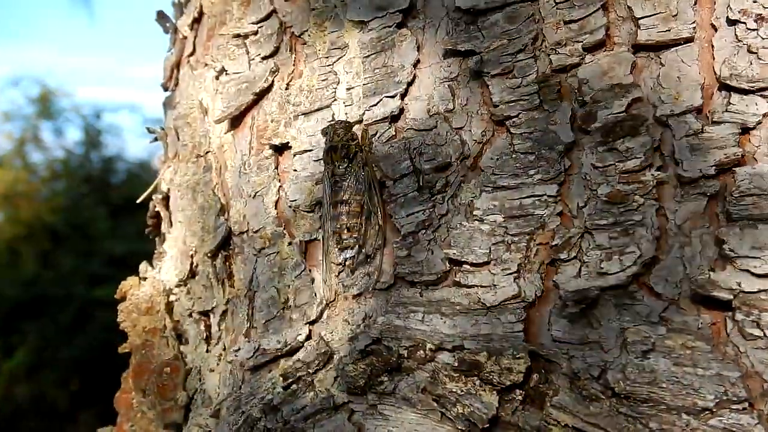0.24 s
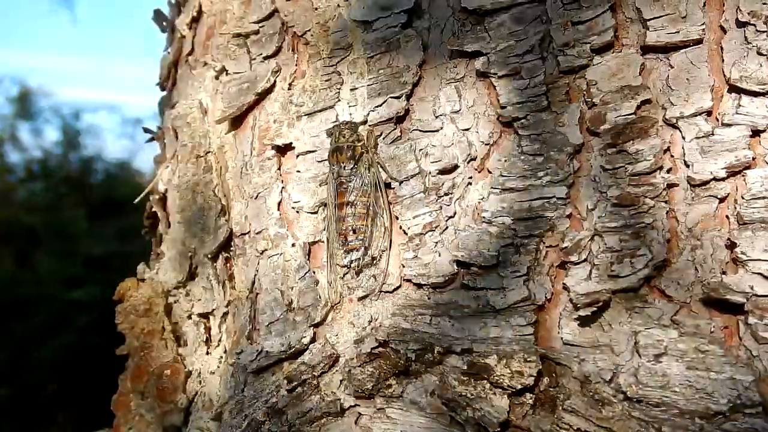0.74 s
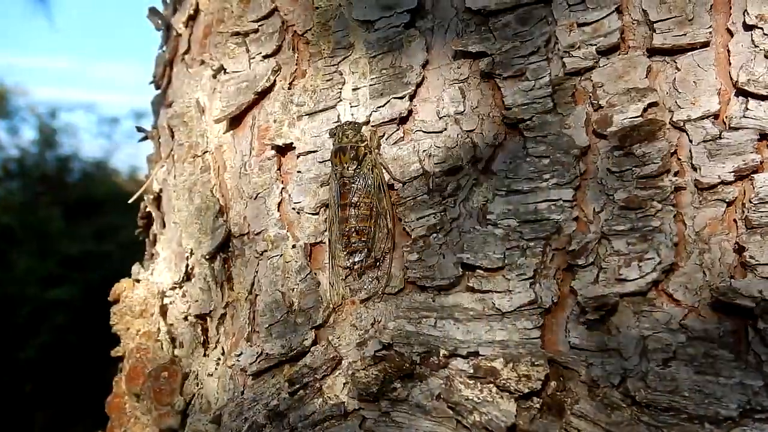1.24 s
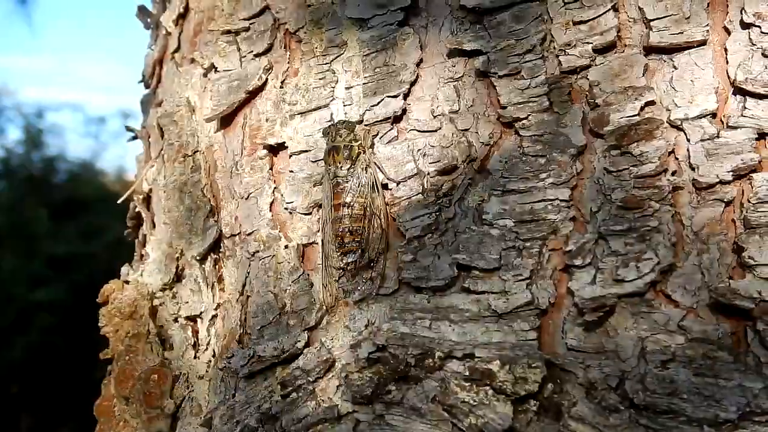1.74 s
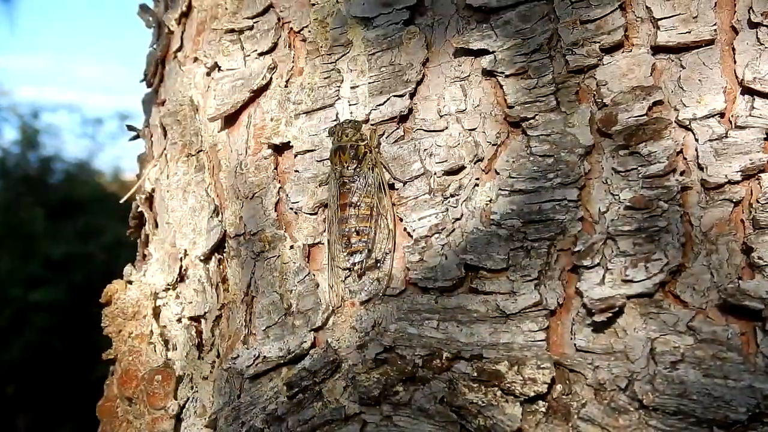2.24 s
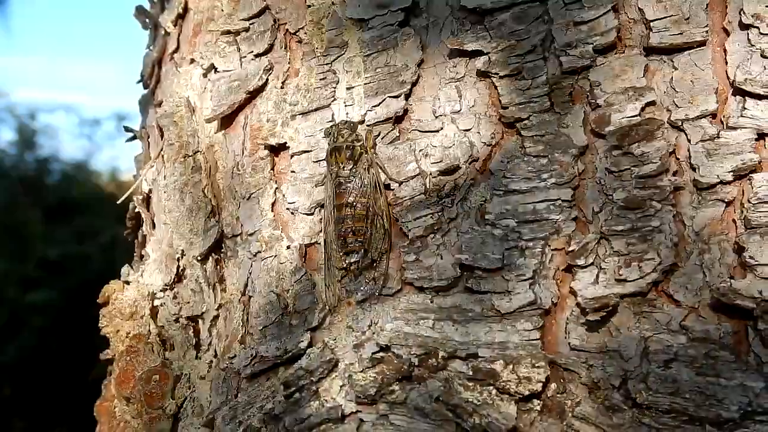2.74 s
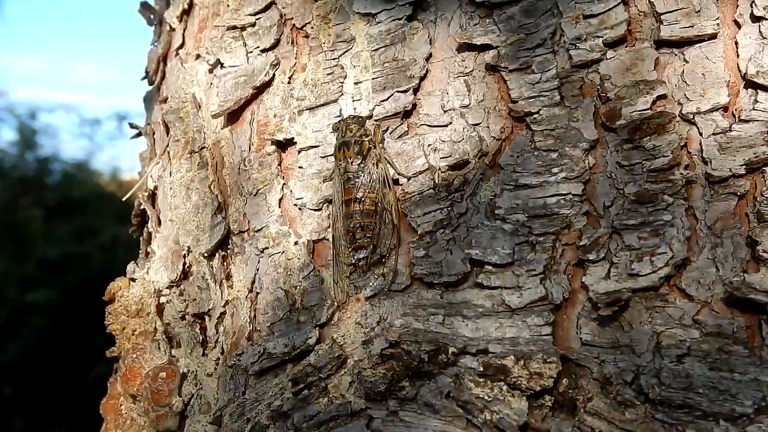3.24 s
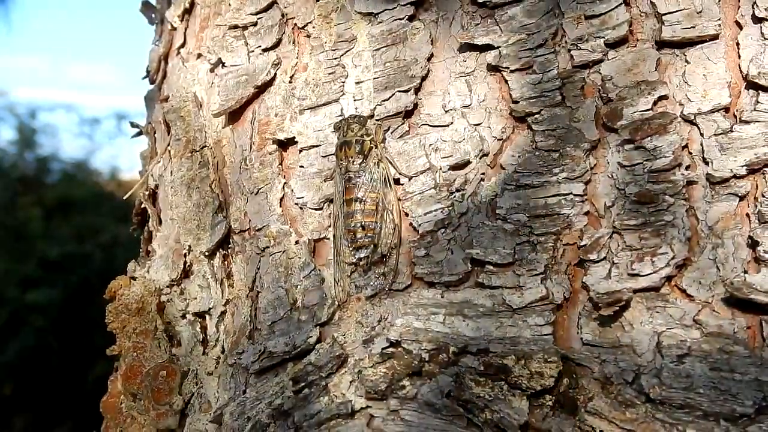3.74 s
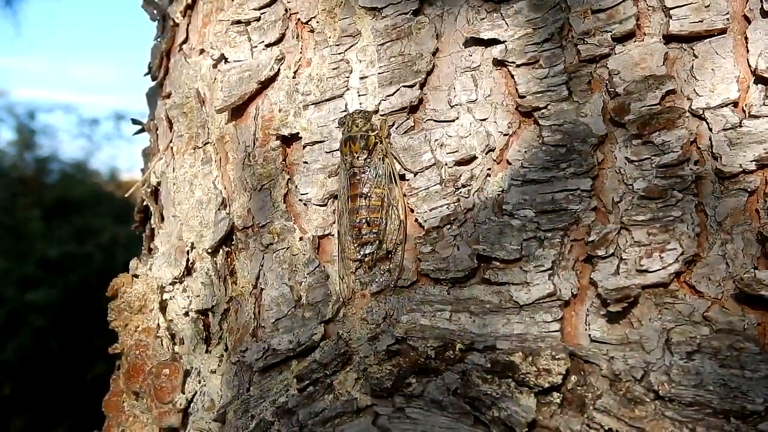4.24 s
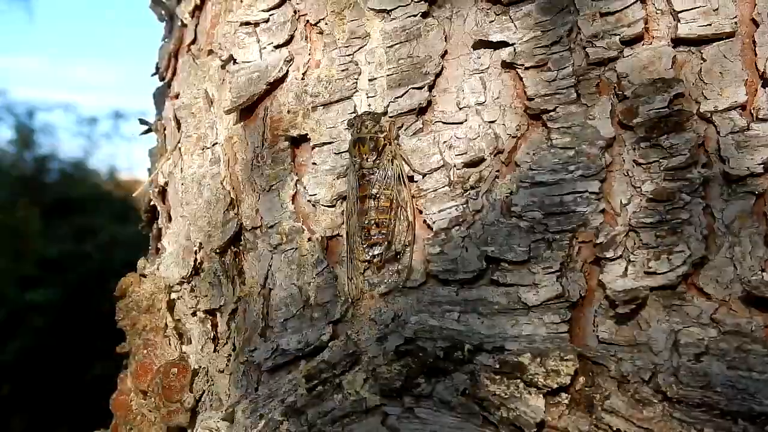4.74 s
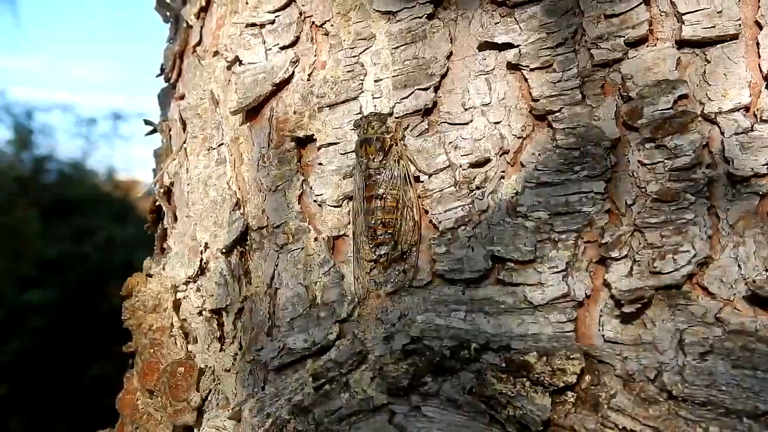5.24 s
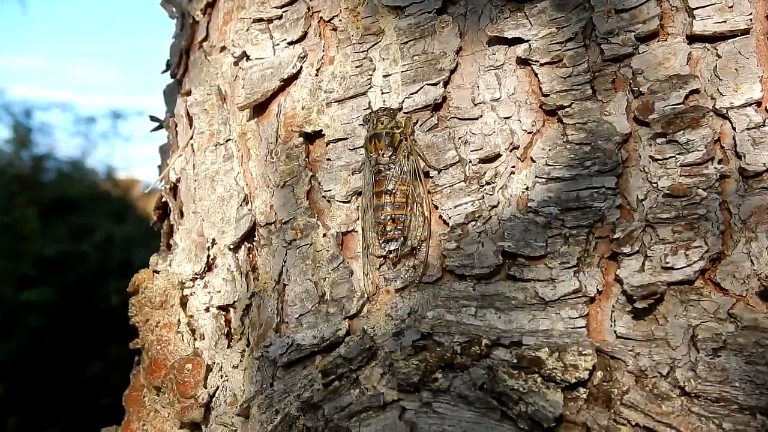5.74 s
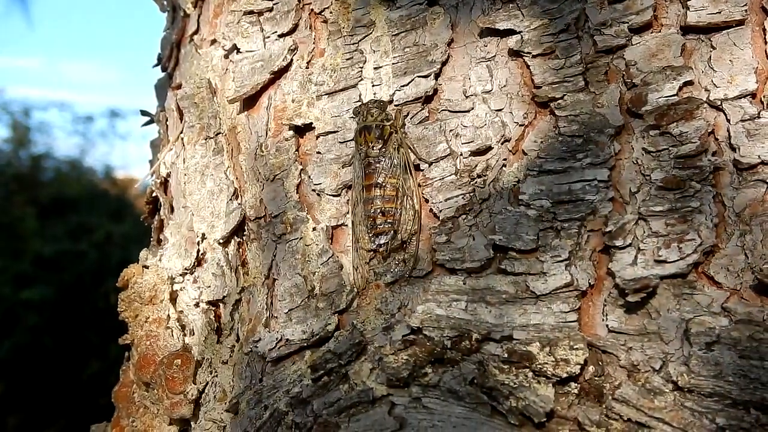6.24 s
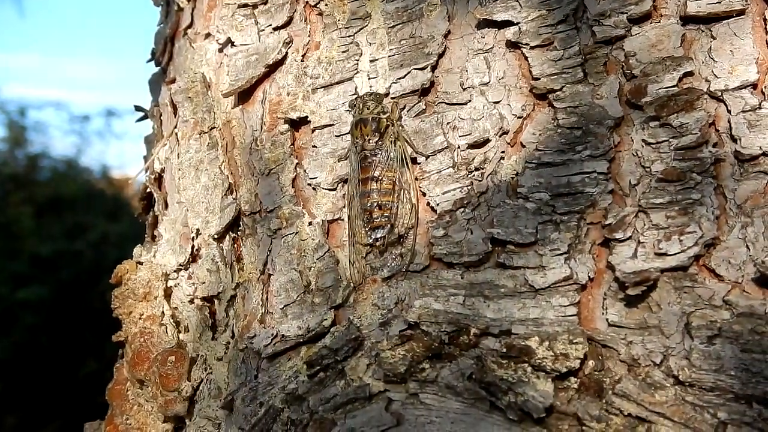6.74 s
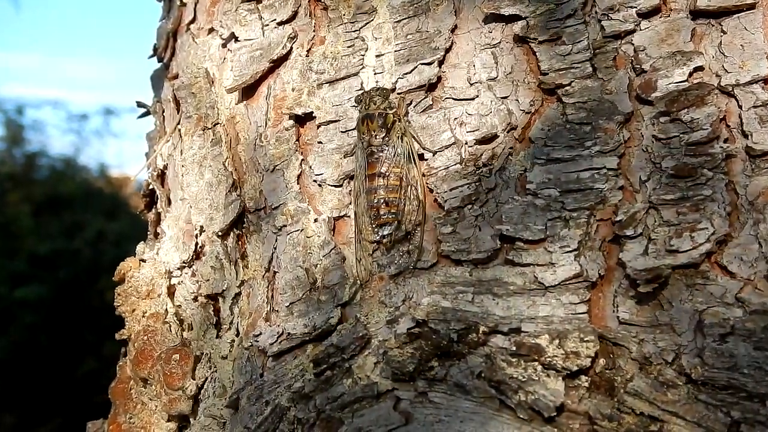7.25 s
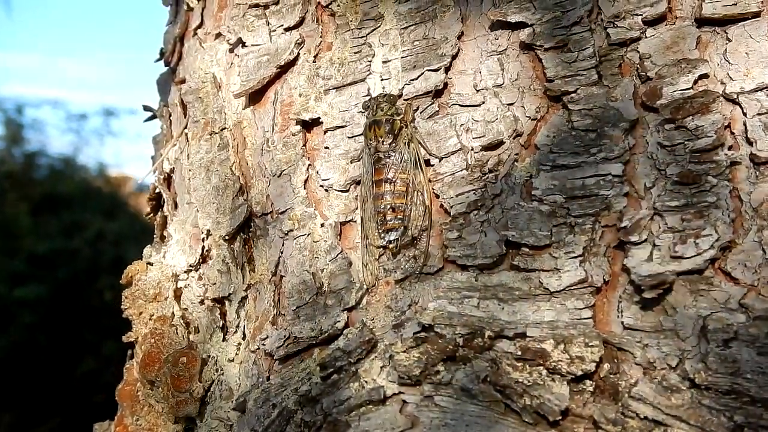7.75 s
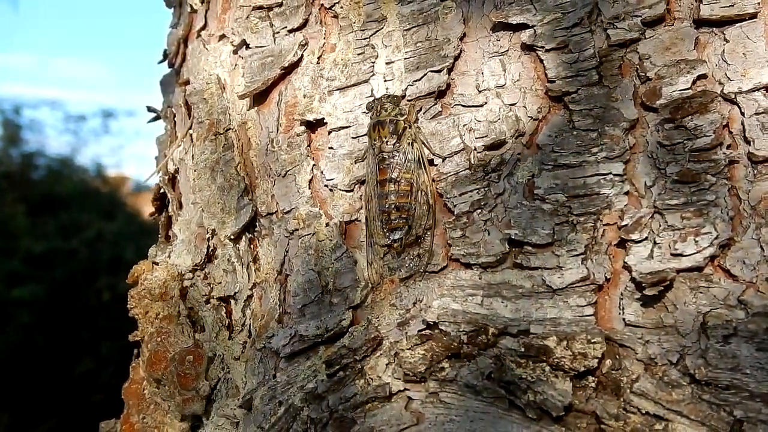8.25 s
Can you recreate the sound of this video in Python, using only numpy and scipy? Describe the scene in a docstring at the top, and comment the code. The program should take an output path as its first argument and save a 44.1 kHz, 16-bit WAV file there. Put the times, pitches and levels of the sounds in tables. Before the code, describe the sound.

Very close outdoors, one cicada on a tree trunk repeats a short, bright, rattling chirp about every 0.4 seconds. Each chirp lasts under a tenth of a second, opens with a faint tick, then swells into a rapid buzz and stops abruptly. Low soft wind buffets and puffs touch the microphone mainly in the first two and a half seconds, then mostly fade. A faint smooth background haze continues throughout, with little echo.

```python
"""A cicada sings on a pine trunk, close to the microphone: about 2.4 short rasping chirps a second.
In each chirp two tymbals buckle in turn; every stroke is two rib snaps, then a slowing run of clicks.
The clicks ring through body spectra and scatter off bark and trees as decaying noise echoes.
A light breeze buffets the microphone, mostly at first, as gusty shaped noise with single puffs.
Behind it lies a faint far haze of smooth noise; capsules, gain control and filters shape the sum."""
import sys
import numpy as np
from scipy import signal
from scipy.fft import rfft, irfft, next_fast_len
from scipy.io import wavfile
from scipy.ndimage import uniform_filter1d

SR = 44100
rng = np.random.default_rng(int(sys.argv[2]) if len(sys.argv) > 2 else 0)


def unload_wav(signal):
    """Save mono or channel-first audio to the path in sys.argv[1] as 16-bit WAV at rate SR, clipped to [-1, 1]."""
    wavfile.write(
        sys.argv[1],
        SR,
        np.round(np.clip(np.atleast_2d(signal).T, -1, 1) * 32767).astype(np.int16),
    )


N = 374409
TIME_S = np.arange(N) / SR
SIZE = next_fast_len(N + SR, real=True)
FREQS_HZ = np.maximum(np.arange(SIZE // 2 + 1) * SR / SIZE, 1)

# breeze strength at the microphone: (time [s], relative level [dB])
BREEZE_LEVEL = [(0, -49), (.28, -58.5), (.85, -53), (1.35, -54.5), (1.63, -44.5), (1.88, -59.5),
                (2.08, -50), (2.22, -65), (2.5, -56.5), (3.3, -73.5), (4.5, -64.5), (4.8, -75),
                (5.3, -60.5), (5.95, -77.5), (6.45, -54.5), (6.9, -70.5), (8.2, -58), (8.49, -68.5)]
# colour of its buffeting: (frequency [Hz], relative density [dB per Hz])
BUFFET_COLOUR = [(25, -28), (60, -20), (95, -15), (130, -1.5), (170, 1.5), (240, -2.5), (330, -7.5),
                 (550, -20), (1000, -26.5), (1500, -45), (3000, -61.5), (10000, -90.5)]
# brighter rush of a strong gust: (frequency [Hz], relative density [dB per Hz])
GUST_COLOUR = [(120, -29), (220, -8), (330, -2.5), (600, -4.5), (1100, -21), (2000, -41.5), (8000, -89)]
# far haze: (time [s], level [dB])
HAZE_LEVEL = [(0, -64.5), (2.2, -62), (3, -61.5), (4, -61.5), (5.5, -60), (7, -61.5), (8.49, -60)]
# its colour: (frequency [Hz], relative density [dB per Hz])
HAZE_COLOUR = [(25, -22.5), (90, -9), (170, -5), (400, -6), (700, -2), (1200, -7), (2000, -13), (2800, -19),
               (3800, -31.5), (4900, -19.5), (5900, -22.5), (8000, -34), (11000, -42), (15000, -36.5)]
# its left-right likeness: (frequency [Hz], likeness [0-1])
HAZE_LIKENESS = [(100, 0.6), (700, 0.9), (2000, 0.2), (5000, .4), (9000, .1)]
# air puffs thumping on the microphone: (peak time [s], relative level [dB], Gaussian sigma [s])
PUFFS = [(0.044, -41.5, 0.011), (.218, -43.5, 0.0054), (.475, -36.5, 0.012), (.715, -44, 0.0061),
         (.84, -40.5, 0.013), (1.26, -43, 0.01), (1.49, -37, 0.0087), (1.587, -39.5, .009),
         (1.65, -38, .009), (1.82, -48.5, 0.007), (2.01, -34, .012), (2.13, -42.5, 0.0096),
         (2.388, -46.5, .012), (2.495, -46, 0.013), (2.999, -53, .025), (4.385, -49.5, 0.011),
         (4.672, -48, .008), (6.335, -47, 0.018), (6.5, -46.5, 0.0069), (7.611, -46, .008),
         (7.89, -52, 0.0093), (8.299, -42.5, 0.01)]
# chirps: (start [s], length [s], relative level [dB])
CHIRPS = [(0.054, 0.078, -0.1), (0.4219, 0.088, 0.5), (0.8229, 0.094, 0.8), (1.2156, 0.077, 1),
          (1.619, 0.092, 1.3), (2.072, 0.091, 0.5), (2.536, 0.086, 0.5), (2.9542, 0.093, 0.4),
          (3.3563, 0.091, 1), (3.7527, 0.087, 1.5), (4.161, 0.091, 2), (4.5604, 0.087, 2),
          (4.9776, 0.093, 1.5), (5.3712, 0.087, 1.5), (5.766, 0.088, 1.6), (6.191, 0.086, 1.5),
          (6.5711, 0.089, 1.36), (7.003, 0.089, 1.5), (7.3887, 0.09, 1.5), (7.8215, 0.089, 1.5),
          (8.2527, 0.084, 1)]
# stroke spacing, shortening through the song: (time [s], gap [s])
STROKE_GAP = [(0, 0.0064), (3.2, .00608), (8.4, .00597)]
# first ribs of a stroke, each a clean snap: (delay [s], relative level [dB])
SNAPS = [(.0005, 1.5), (.0019, 3)]
# body radiation of the snaps: (frequency [Hz], relative gain [dB])
SNAP_COLOUR = [(300, -50), (1400, -49), (2100, -24.5), (2800, -16.5), (3500, -43), (3950, -21.5),
               (4500, -9.5), (5150, 1.5), (5550, -4.5), (6100, -24.5), (7200, -32.5), (8300, -43.5),
               (9200, -55), (15000, -72.5)]
# remaining ribs, a quick run in order: (relative level [dB])
RUN_LEVELS = [-12.5, 0.5, 1, 0, 5, 0, 5, -3.5]
# body radiation of the run: (frequency [Hz], relative gain [dB])
RUN_COLOUR = [(300, -49.5), (1400, -43), (1850, -13), (2250, -12.5), (2900, -12), (3450, -31),
              (3800, -18.5), (4250, 3), (5300, 6.5), (6000, -2.5), (6950, -10.5), (8200, -31), (9100, -52),
              (13000, -63.5)]
# left minus right at the two ports: (frequency [Hz], level difference [dB])
PORT_BALANCE = [(800, -13.5), (1900, 1), (2900, -4.5), (3500, -3.5), (4300, 3), (5300, 3), (6900, 7),
                (8000, 18), (9200, 6), (14000, -4)]
# lead of left over right: (frequency [Hz], phase [rad])
PORT_PHASE = [(3200, 0.015), (4200, 0.38), (5000, 1.2), (6200, .95), (7300, 0.81)]
# scattering by bark, then by trees around: (delay [s], t60 [s], level [dB])
SCATTER = [(.001, 0.078, -23), (0.026, 0.609, -50.5)]
# narrow recorder notches that ring on after a chirp: (centre [Hz], width [Hz])
NOTCHES = [(2500, 150), (2500, 150), (5000, 46)]

# muscle effort: opening twitch, falling off on either side of its peak
TWITCH_PEAK_S, TWITCH_DB, TWITCH_DB_PER_S = 0.0033, -11, 1800.5
# then a swell: onset, depth below the hold at onset, time constant, held level
SWELL_START_S, SWELL_DEPTH_DB, SWELL_TAU_S, HOLD_DB = 0.011, 22.5, 0.014, 1.5


def from_db(db):
    """Decibels to gain."""
    return 10 ** (np.asarray(db) / 20)


def along(rows, time_s):
    """Read a curve at the given times."""
    return np.interp(time_s, *np.transpose(rows))


def over_hz(points):
    """Read a spectrum at every bin, on a log frequency axis."""
    hz, value = np.transpose(points)
    return np.interp(np.log(FREQS_HZ), np.log(hz), value)


def rms_one(x):
    """Scale to rms 1."""
    return x / np.sqrt(np.mean(x ** 2) + 1e-20)


def drift(corner_hz):
    """Random wander of rms 1: white noise rolled off above corner_hz."""
    spectrum = rfft(rng.standard_normal(SIZE))
    return rms_one(irfft(spectrum / (1 + (FREQS_HZ / corner_hz) ** 2), SIZE)[:N])


def noise(colour, likeness):
    """Stereo noise of given colour and left-right likeness, rms 1 over both channels."""
    mid, side = rfft(rng.standard_normal((2, SIZE)))
    pair = np.sqrt(1 + likeness) * mid + np.sqrt(1 - likeness) * side * [[1], [-1]]
    return rms_one(irfft(pair * from_db(over_hz(colour)), SIZE)[:, :N])


def breeze(level_db=3.5, unsteady_db=5.5, flurry_hz=8, lumpy_db=3.5, eddy_hz=35, right_db=2.5,
           gust_db=-11.5, strong_db=-41.0, gust_growth_db_per_db=0.24):
    """Flurries of wind; eddies buffet each port on its own, and strong gusts reach higher in pitch."""
    wind_db = along(BREEZE_LEVEL, TIME_S) + unsteady_db * drift(flurry_hz)
    eddy_db = lumpy_db * np.array([drift(eddy_hz), drift(eddy_hz)])
    eddies = rms_one(from_db(eddy_db))
    rush_db = gust_db + gust_growth_db_per_db * (wind_db - strong_db)
    turbulence = noise(BUFFET_COLOUR, 0) + from_db(rush_db) * noise(GUST_COLOUR, 0)
    return from_db(level_db + wind_db) * from_db([[0], [right_db]]) * eddies * turbulence


def haze(right_db=3.0):
    """Far, smooth outdoor noise, partly alike left and right, a little to the right."""
    far = noise(HAZE_COLOUR, over_hz(HAZE_LIKENESS))
    balance = from_db([[-right_db / 2], [right_db / 2]])
    return from_db(along(HAZE_LEVEL, TIME_S)) * balance * far


def puffs(level_db=0.5, rush_db=-11.5, likeness=0.35):
    """Each puff is a brief Gaussian swell of low turbulence with a little brighter rush."""
    swell = np.zeros(N)
    for peak_s, puff_db, sigma_s in PUFFS:
        swell += from_db(puff_db) * np.exp(-.5 * ((TIME_S - peak_s) / sigma_s) ** 2)
    turbulence = noise(BUFFET_COLOUR, likeness) + from_db(rush_db) * noise(GUST_COLOUR, likeness)
    return from_db(level_db) * swell * turbulence


def muscle_effort_db(age_s):
    """Effort over the age of a chirp: a twitch, a brief lull, then a swell that levels off."""
    twitch_db = TWITCH_DB - TWITCH_DB_PER_S * np.abs(age_s - TWITCH_PEAK_S)
    swell_db = HOLD_DB - SWELL_DEPTH_DB * np.exp((SWELL_START_S - age_s) / SWELL_TAU_S)
    return np.maximum(twitch_db, swell_db)


def rib_clicks(delay_s, rib_db, stiffness_db_per_db, limp_s, habit_s, jitter_s, uneven_db,
               pace_spread, slack_db_per_s, strokes=18):
    """Clicks of these ribs in every stroke; stiffer ribs depend more steeply on muscle effort."""
    stroke = np.arange(strokes)[:, None]
    # uneven pattern repeated in every chirp
    habit, habit_strength, habit_pace = rng.standard_normal((3, strokes, 1))
    clicks = np.zeros(SIZE)
    for start_s, length_s, level_db in CHIRPS:
        jitter, strength, pace = rng.standard_normal((3, strokes, 1))
        # tymbals alternate, one lagging a little
        lag_s = limp_s * (1 - stroke % 2) * (stroke > 0)
        stroke_s = stroke * along(STROKE_GAP, start_s) + lag_s + habit_s * habit + jitter_s * jitter
        age_s = stroke_s + delay_s * (1 + pace_spread * (habit_pace + pace))
        # muscle goes slack at the end of the chirp
        slack_db = slack_db_per_s * np.maximum(age_s - length_s, 0)
        effort_db = muscle_effort_db(age_s) - slack_db
        strength_db = uneven_db * (habit_strength + strength)
        force = from_db(level_db + rib_db + stiffness_db_per_db * effort_db + strength_db)
        # split each click between neighbouring samples
        fraction, sample = np.modf((start_s + age_s) * SR)
        np.add.at(clicks, sample.astype(int), force * (1 - fraction))
        np.add.at(clicks, sample.astype(int) + 1, force * fraction)
    return clicks


def cicada(snap_db=17.0, run_db=5.0, first_rib_hz=2620, last_rib_hz=2040, run_start_s=.0024):
    """Rib clicks sound through the body and reach the two ports with different strength and phase."""
    snaps = rib_clicks(*np.transpose(SNAPS), stiffness_db_per_db=0.75, limp_s=.0003,
                       habit_s=.00018, jitter_s=.00018, uneven_db=1.55, pace_spread=0.1,
                       slack_db_per_s=7001.5)
    # the run slows, so its overtones glide down in every stroke
    rib_gaps_s = 1 / np.linspace(first_rib_hz, last_rib_hz, len(RUN_LEVELS) - 1)
    run_delay_s = run_start_s + np.append(0, np.cumsum(rib_gaps_s))
    runs = rib_clicks(run_delay_s, np.array(RUN_LEVELS), stiffness_db_per_db=1.14, limp_s=0.00055,
                      habit_s=.00008, jitter_s=.0001, uneven_db=0.7, pace_spread=.04,
                      slack_db_per_s=8998.5)
    snap_song = rfft(snaps) * from_db(snap_db + over_hz(SNAP_COLOUR))
    run_song = rfft(runs) * from_db(run_db + over_hz(RUN_COLOUR))
    side = np.array([[.5], [-.5]])
    ports = from_db(side * over_hz(PORT_BALANCE)) * np.exp(1j * side * over_hz(PORT_PHASE))
    return irfft((snap_song + run_song) * ports, SIZE)[:, :N]


def scattered(x):
    """Dense faint echoes as decaying noise: a short spray from the trunk, a longer one from the wood."""
    age_s, echoes = TIME_S[:SR], 0
    for delay_s, t60_s, level_db in SCATTER:
        spray = rng.standard_normal((2, SR)) * from_db(-60 * age_s / t60_s) * (age_s > delay_s)
        echoes = echoes + from_db(level_db) * rms_one(spray) / np.sqrt(SR)
    return signal.fftconvolve(x, echoes, axes=1)[:, :N]


def scene():
    """The near insect and its echoes, over breeze, puffs and haze."""
    song = cicada()
    return song + scattered(song) + breeze() + puffs() + haze()


def capsules(x, left_db=-38.0, right_db=-18.0, low_hz=140, high_hz=2600):
    """Capsules bend slightly under the loud song; the square adds a low rasp and an octave above."""
    band = signal.butter(1, [low_hz, high_hz], "band", fs=SR, output="sos")
    return x + from_db([[left_db], [right_db]]) * signal.sosfilt(band, x ** 2)


def gain_control(x, threshold_db=-23, squeeze_db_per_db=.6, attack_s=.002, release_db_per_s=18):
    """Level above the threshold pushes the gain down; it creeps back at a steady dB rate."""
    power = uniform_filter1d(np.mean(x ** 2, axis=0), size=260)
    level_db = 10 * np.log10(np.maximum(power, 1e-12))
    wanted_cut_db = squeeze_db_per_db * np.maximum(level_db - threshold_db, 0)
    # running peak on a rising ramp = peak hold with linear release
    recovery_db = release_db_per_s * TIME_S
    cut_db = np.maximum.accumulate(wanted_cut_db + recovery_db) - recovery_db
    pole = np.exp(-1 / (attack_s * SR))
    return x * from_db(-signal.lfilter([1 - pole], [1, -pole], cut_db))


def record(dry, cutoff_hz=15600):
    """Capsules, gain control, notch filters and a steep top cut."""
    x = gain_control(capsules(dry))
    for centre_hz, width_hz in NOTCHES:
        x = signal.lfilter(*signal.iirnotch(centre_hz, centre_hz / width_hz, fs=SR), x)
    # order 10, 0.1 dB ripple, 80 dB stopband
    top_cut = signal.ellip(10, .1, 80, cutoff_hz, fs=SR, output="sos")
    return signal.sosfilt(top_cut, x)


dry = scene()
out = record(dry)
unload_wav(out)
```